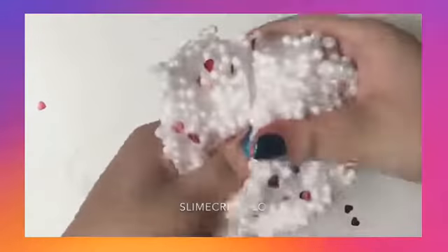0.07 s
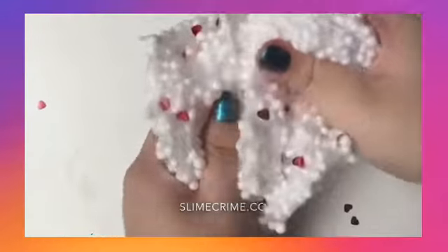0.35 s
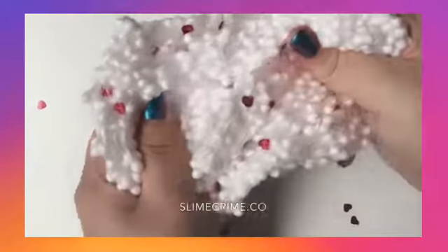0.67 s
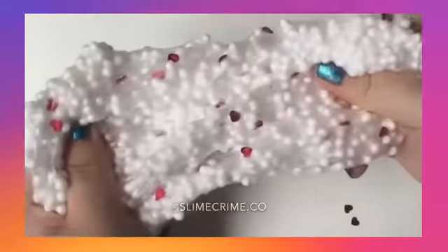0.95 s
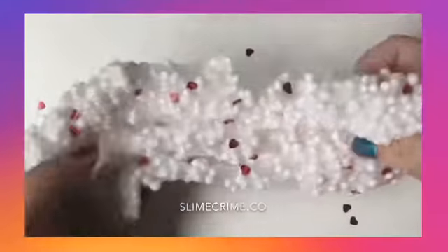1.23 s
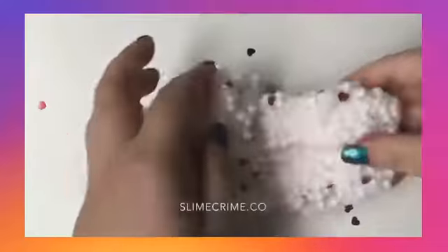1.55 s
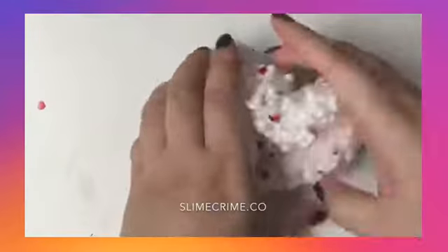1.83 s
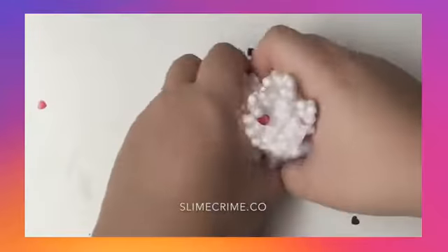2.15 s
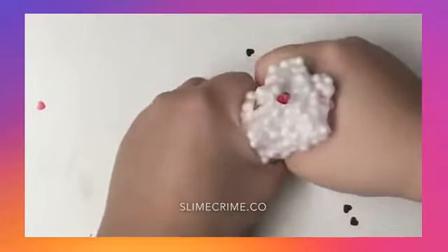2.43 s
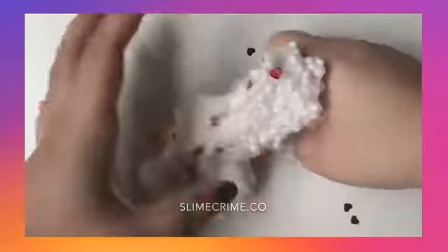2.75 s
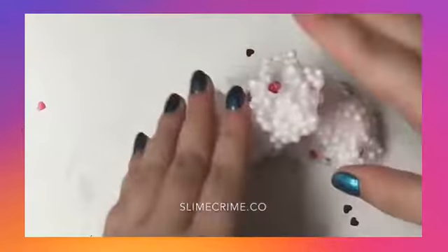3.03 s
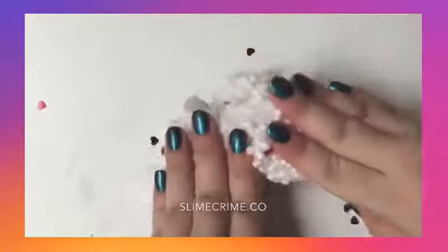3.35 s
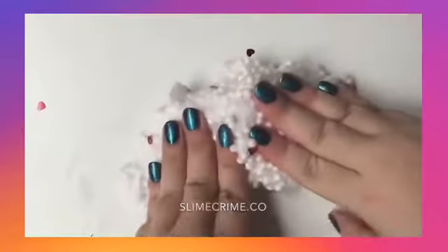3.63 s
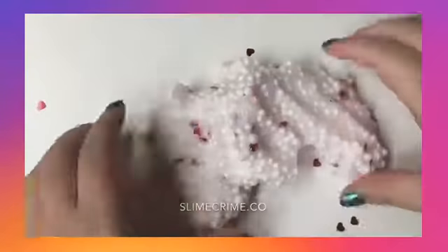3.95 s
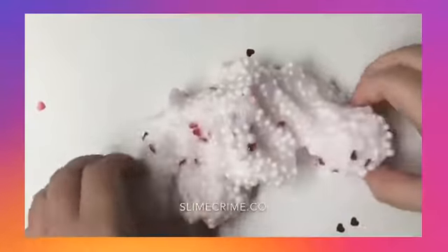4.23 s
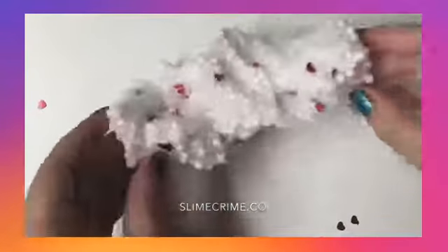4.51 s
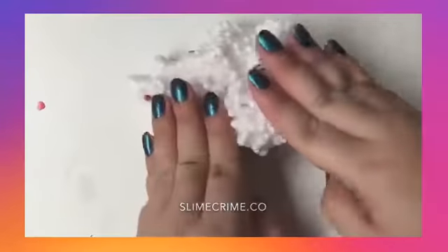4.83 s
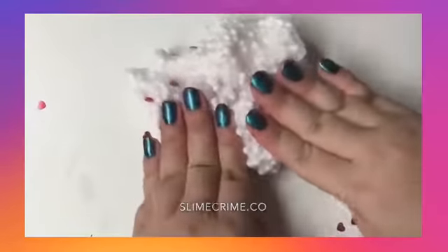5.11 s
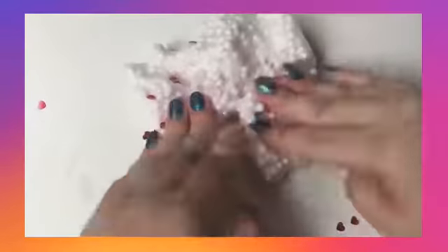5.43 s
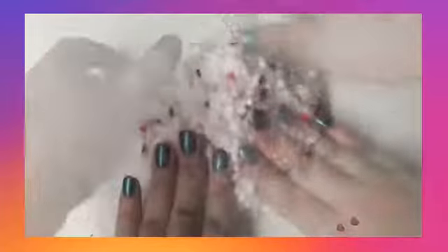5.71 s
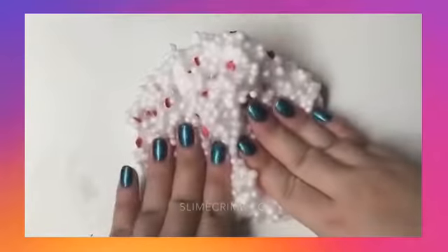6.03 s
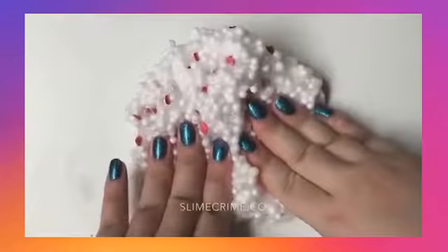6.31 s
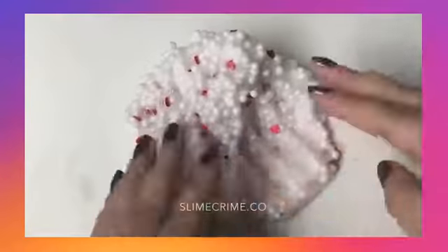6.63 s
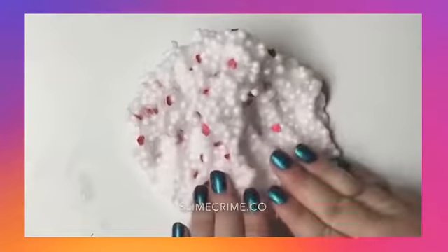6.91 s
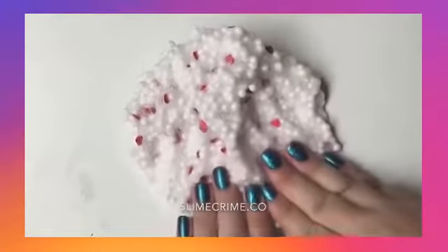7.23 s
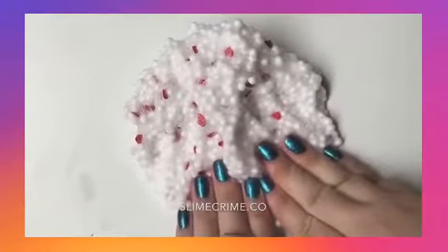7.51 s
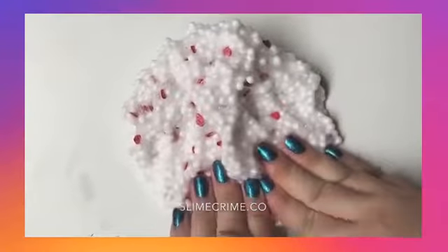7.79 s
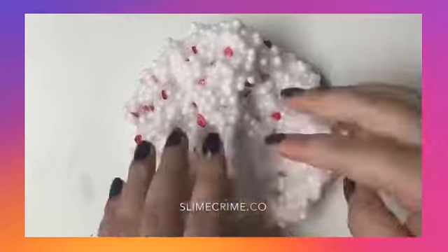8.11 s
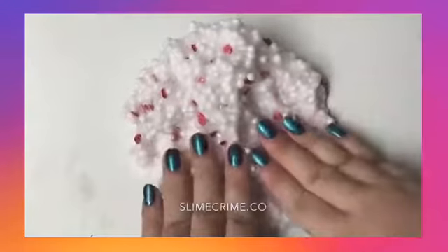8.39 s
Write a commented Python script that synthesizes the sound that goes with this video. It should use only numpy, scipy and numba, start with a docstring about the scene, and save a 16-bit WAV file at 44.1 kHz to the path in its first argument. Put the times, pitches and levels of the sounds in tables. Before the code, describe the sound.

Two hands stretch foam-bead slime, and it fizzes with a fine, wet crackle and sharp little snaps. A hard squeeze thickens the crackle into a loud, short rip. Then the slime is pressed and peeled again and again on a table, each stroke a crunchy burst with small bubble pops and an occasional soft thud. The sound is close, in a small, dry room with a faint rumble and hiss.

```python
"""A fine, wet crackle, close up: two hands knead, stretch and press foam-bead slime on a table.
Tiny air pockets burst between the beads, and the crackle thickens to a rip when the slime peels away.
Thin films snap, bigger bubbles pop singly, a few deep pockets thud and hollows ring briefly.
A small, dry room lies behind, with a low rumble and a faint hiss."""
import sys
import numpy as np
from scipy import signal
from scipy.fft import rfft, irfft, next_fast_len
from scipy.io import wavfile
from numba import njit

SR = 44100
rng = np.random.default_rng(int(sys.argv[2]) if len(sys.argv) > 2 else 0)


def unload_audio(sound):
    """Save the sound as a 16-bit wav file, at the path given as the first command line argument."""
    columns = np.transpose(np.atleast_2d(sound))
    # keep every value between -1 and 1, then stretch to whole-number steps
    steps = np.round(np.clip(columns, -1, 1) * 32767)
    wavfile.write(sys.argv[1], SR, steps.astype(np.int16))


N = 377039
TIME = np.arange(N) / SR


def kneading(crackle_db, squelch_db, rumble_db, fitful):
    """Pockets of every size give way: in fits and starts under gentle pressure, in one rip on a peel."""
    # EQ of each layer: freq_hz, gain_db
    crackle_eq = [(500, -10), (2000, 4.5), (3500, -5), (6000, -3.5), (9000, 2.5), (11000, 5.5),
                  (13500, 5.5)]
    squelch_eq = [(150, -3.5), (500, -9.5), (900, 4.5), (1500, 2), (2300, -2), (3500, 2), (6000, -9.5),
                  (13000, -15)]
    rumble_eq = [(25, -11), (70, 4.5), (150, -0.5), (270, 1), (450, 3.5), (1000, -11.5), (8000, -40.5)]
    fits_db = stick_slip(rate=55, fade_s=.0015, steady_share=.36, scatter_db=4.5)
    slip_db = 1.4 * walk(40) + .7 * walk(260) + fitful * fits_db
    crackle = swarm(crackle_db + slip_db, rate=6000, band_hz=(3510, 13800), q=3.7, scatter_db=4.5,
                    wander=1)
    squelch = swarm(squelch_db + slip_db, rate=2800, band_hz=(1256, 3810), q=2, scatter_db=.5,
                    wander=.41)
    # wide cavities suck open only where wet squelching and dragging come together
    suction_db = np.minimum(.42 * squelch_db + .58 * rumble_db, squelch_db + 1)
    laid_down_s = 4.7  # they gape in the lifted lump, less once it is pressed flat
    suction_db += np.where(TIME < laid_down_s, 2.5, -2.5)
    suction = swarm(suction_db + .7 * slip_db, rate=700, band_hz=(550, 1090), q=5.3, scatter_db=4,
                    wander=.78)
    rumble = swarm(rumble_db + .4 * slip_db, rate=900, band_hz=(64.3, 424), q=2.9, scatter_db=-1.5,
                   wander=.37)
    return (eq(crackle, crackle_eq) + eq(squelch, squelch_eq)
            + undb(-2.1) * suction + eq(rumble, rumble_eq))


def handwork():
    """The hands' strokes set the crackle, squelch and rumble envelopes in dB, and how fitful they are."""
    # rise and fall each span 10 dB; wetness and drag are relative to the stroke's crackle the slime is drawn
    # out and fizzes, save the row at 0.405 s, a brief ring after the loud snap: peak_s, rise_s, fall_s,
    # crackle_db, wetness_db
    stretches = [(0.03, 0.066, 0.25, -43, -12), (0.27, 0.14, 0.11, -49, -7), (0.405, .01, .05, -39, -13),
                 (0.74, .36, 0.29, -47, -10), (0.94, .02, 0.024, -39, -11), (1.03, .035, 0.14, -36, -10),
                 (1.18, 0.062, 0.067, -39, -11), (1.35, .07, .12, -39, -9), (1.6, 0.13, .2, -47, -10),
                 (4.2, .16, 0.085, -44, -9.5), (4.51, 0.054, 0.19, -53, -12)]
    # fingers press into the lump: peak_s, rise_s, fall_s, crackle_db, wetness_db
    presses = [(1.96, 0.11, 0.093, -42, 0), (2.09, 0.063, 0.11, -32, -10), (2.2, 0.0527, .1, -33, -10),
               (2.301, 0.028, 0.041, -32, -12), (2.385, .035, .048, -28, -13),
               (3.22, .05, 0.095, -52, -11.5), (3.35, .055, .17, -40, -6), (4.75, 0.053, 0.095, -54, -8),
               (4.92, 0.071, 0.098, -43, -6), (5.04, .07, 0.16, -44, -6), (5.44, .07, .16, -55, -6),
               (5.67, 0.099, 0.1204, -47.5, -4.5), (5.87, .13, .21, -44, -9), (5.945, .02, 0.023, -32, -13),
               (6.96, .075, 0.21, -35, -7), (7.26, 0.083, 0.22, -47, -7), (7.47, .025, 0.051, -45.5, -9),
               (8.3, .04, 0.09, -47, -9.5), (8.43, 0.094, 0.088, -40, -6)]
    # the slime rips off the skin: peak_s, rise_s, fall_s, crackle_db, wetness_db, drag_db
    peels = [(2.545, 0.029, .072, -22.5, -7.5, -16), (2.7, .08, .11, -37, -8.5, -11.5),
             (3.7, 0.0472, 0.042, -28, -11, -18), (4.3, .05, .042, -29, -15, -23),
             (5.322, .036, .033, -29, -11, -18), (6.335, .048, .043, -23.5, -12, -21),
             (7.79, .06, 0.089, -30, -11.5, -19), (7.95, .06, 0.053, -44, -12.5, -20)]
    # the lump is patted or settles on the table: peak_s, rise_s, fall_s, rumble_db
    pats = [(1.81, 0.04103, 0.072, -60), (2.8, 0.047, 0.055, -52), (2.93, 0.079, .18, -62),
            (3.515, 0.014, 0.052, -49), (3.8, .03, 0.0298, -61), (3.905, .015, .035, -44),
            (3.99, .06, .18, -58), (5.57, 0.038, 0.059, -58), (6.775, .02, 0.037, -57),
            (8.095, 0.035, 0.032, -61)]
    wetness, drag = 4, 5  # columns
    stretch, press, pat = (strokes(rows) for rows in (stretches, presses, pats))
    wet_stretch, wet_press = (strokes(rows, wetness) for rows in (stretches, presses))
    peel, wet_peel, peel_drag = (strokes(peels, column, shape=1.5, stop=1.25)
                                 for column in (None, wetness, drag))
    rest_crackle_db, rest_squelch_db, rest_rumble_db = -75, -77, -74  # slime left alone
    crackle = power_sum(stretch, press, peel, pat - 10, rest_crackle_db)
    squelch = power_sum(wet_stretch, wet_press, wet_peel, pat - 11, rest_squelch_db)
    dough = lambda db: .55 * (db + 40)  # the dough's rumble grows more slowly than its crackle
    rumble = power_sum(dough(stretch) - 60, dough(press) - 63, peel_drag, pat, rest_rumble_db)
    share = lambda db: undb(db - crackle) ** 2
    fitful = .65 * share(stretch) + 1.05 * share(press) + .62 * share(peel)  # 0 even, 1 fits and starts
    return crackle, squelch, rumble, fitful


def strokes(rows, offset_column=None, shape=1.45, stop=1):
    """Strokes swell and fade, in dB; shape 1 peaks sharply, 2 roundly, and stop over 1 cuts the tail."""
    t = TIME[::50]
    swells = []
    for row in rows:
        peak, rise, fall, db = row[:4]
        db += row[offset_column] if offset_column else 0
        away = np.abs(t - peak) / np.where(t < peak, rise, fall)
        swells.append(db - 10 * away ** np.where(t < peak, shape, shape * stop))
    return np.interp(TIME, t, power_sum(*swells))


def stick_slip(rate, fade_s, steady_share, scatter_db):
    """The level in dB jumps when a patch lets go, drops within milliseconds and idles between slips."""
    chance, strength = rng.random(N), rng.standard_normal(N)
    slips = (chance < rate / SR) * undb(2 * scatter_db * np.clip(strength, -2, 1.3))
    power = signal.lfilter([1], [1, -np.exp(-1 / (fade_s * SR))], slips)
    return 10 * np.log10(steady_share + (1 - steady_share) * power / np.mean(power))


def swarm(level_db, rate, band_hz, q, scatter_db, wander, crowding=.5, count=180000):
    """Pockets burst at random, rate a second at -45 dB; harder work bursts more as well as bigger ones."""
    density = np.minimum(rate * undb(crowding * (level_db + 45)), 20000)
    due = np.cumsum(density) / SR
    wait, pitch, sign = rng.random((count, 3)).T
    strength, ring = np.minimum(rng.standard_normal((count, 2)), 2).T
    turn = np.cumsum(-np.log(1 - wait))
    at = np.searchsorted(due, turn[turn < due[-1]])  # each pocket bursts when its turn falls due
    n = len(at)
    spread = undb(scatter_db * strength)
    size = spread[:n] / np.sqrt(np.mean(spread ** 2))
    size *= undb(level_db[at]) * np.sqrt(1000 / density[at])
    low_hz, high_hz = band_hz
    hz = low_hz * (high_hz / low_hz) ** pitch[:n]
    # neighbouring pockets are alike in size, so a favoured pitch wanders as the fingers move on
    size *= np.sqrt(1 + np.tanh(wander) * np.cos(2 * np.pi * np.log(hz) + np.pi * walk(18)[at]))
    return bursts(at / SR, hz, q * np.exp(.59 * ring[:n]), size * np.sign(sign[:n] - .5))


@njit
def bursts(times, hz, q, size):
    """Each burst kicks its own damped cavity; size is the rms it would have if spread over 1 ms."""
    out = np.zeros(N)
    for k in range(len(times)):
        w = 2 * np.pi * min(hz[k], .4 * SR) / SR
        loss = np.sin(w) / (2 * q[k])
        kick = size[k] * np.sqrt(SR / 1000 * loss / (1 + loss))
        pull, keep = 2 * np.cos(w) / (1 + loss), (1 - loss) / (1 + loss)
        start, last, before = int(times[k] * SR), 0., 0.
        for i in range(min(int(7 / min(loss, w / 3)) + 4, N - start)):
            y = pull * last - keep * before + (kick if i == 0 else -kick if i == 2 else 0.)
            before, last = last, y
            if start + i >= 0:
                out[start + i] += y
    return out


def snaps(small, small_crumble=.06, q=2.07, cluster_s=.0005, spurt_s=.0035, cluster_q=.86, count=24):
    """A film snaps: a sharp tick amid a spurt of smaller ticks; the more crumble, the longer the spurt."""
    # thin films snapping between beads: start_s, level_db (before EQ), pitch_hz, crumble_share
    films = [(0.0349, -15.5, 8600, 0.22), (0.2882, -26.5, 10000, 0.13), (0.302, -14.5, 8600, 0.06),
             (0.34, -25, 8600, 0.7), (0.3979, -6, 9340, 0.06), (0.9477, -22, 10630, 0.36),
             (1.0273, -16, 13150, 0), (1.04, -19.5, 12600, 0.6), (1.1492, -26, 11300, .4),
             (1.1562, -23.5, 9400, 0.2), (1.234, -25.5, 10100, 0.39), (1.2999, -25.5, 11500, 0.04),
             (1.3493, -15, 10500, 0), (1.4287, -23.5, 10070, 0.15), (1.6396, -31, 5487, 0.09),
             (2.0646, -22, 10800, 0.11), (2.0817, -15, 11950, 0.43), (2.106, -18, 12510, 0.08),
             (2.1262, -17.5, 10390, .9), (2.1963, -13.5, 11700, 0.4), (2.2031, -7.5, 11230, 0.05),
             (2.2283, -10, 12600, 0), (2.2517, -23.5, 11500, .1), (2.3078, -12, 10100, 0.05),
             (2.3108, -16, 7240, 0.87), (2.373, -8, 9900, .18), (2.4796, -22.5, 10040, 0.04),
             (2.5256, -14, 6950, 0.1), (2.5647, -10, 10930, 0.28), (2.9774, -36, 10910, 0),
             (3.1808, -19, 11100, 0.09), (3.2817, -27, 12080, 0.4), (3.3485, -23, 7897, .4),
             (3.493, -37, 8340, 0.18), (3.6431, -17.5, 11500, 0.08), (4.2685, -17, 9300, 0.03),
             (4.292, -10.5, 10180, 0.32), (4.7247, -16.5, 10180, 0), (4.8686, -27.5, 8520, 0.19),
             (4.9, -24.5, 8760, 0.43), (5.0029, -30, 10610, 0.43), (5.0809, -20.5, 5800, .1),
             (5.1409, -25.5, 9087, 0.01), (5.3256, -15, 11380, 0.08), (5.423, -28.5, 8100, 0.48),
             (5.7254, -23, 10520, 0), (5.804, -25.5, 9520, 0), (5.838, -26.5, 11240, 0.01),
             (5.9005, -26, 10200, 0.05), (5.9122, -22, 11630, 0), (5.9436, -11, 10800, 0.4),
             (5.9882, -26.5, 11330, 0.35), (6.1746, -34.5, 9295, .15), (6.2444, -26, 11820, 0),
             (6.2953, -16, 9900, 0), (6.8829, -18.5, 8692, .06), (6.897, -15, 10300, 0.1),
             (6.919, -18.5, 7670, .4), (6.9753, -14.5, 8500, 0.27), (6.9833, -8, 8380, 0.2),
             (7.0248, -13, 10110, 0), (7.0504, -11.5, 10410, 0.32), (7.056, -15, 11230, 0.17),
             (7.1091, -19, 11600, 0.1), (7.141, -20.5, 9694, 0), (7.19, -24, 12030, 0.03),
             (7.2062, -25.5, 12470, 0.01), (7.257, -22.5, 10340, 0.4), (7.304, -25.5, 11300, 0.28),
             (7.399, -26.5, 10530, 0.47), (7.4768, -28, 7250, 0.01), (7.7283, -24, 9920, 0.16),
             (7.7764, -18, 12210, .02), (8.241, -20, 9614, 0.1), (8.2606, -23.5, 11570, 0.03),
             (8.2829, -24, 10140, 0.43), (8.4067, -27.5, 7100, .09), (8.4332, -16, 11000, 0.49),
             (8.4957, -17, 11530, 0.15)]
    # snap EQ: freq_hz, gain_db
    snap_eq = [(100, 0), (1000, -3.5), (3000, 2.5), (6000, -0.5), (10000, 0.5), (13500, 2)]
    small_films = np.column_stack([small, np.full(len(small), small_crumble)])
    start, db, hz, crumble = np.vstack([films, small_films]).T
    ticks = bursts(start, hz, np.full(len(start), q), undb(db) * np.sqrt(1 - crumble))
    jitter, detune, size = rng.standard_normal((len(start), 3, count)).transpose(1, 2, 0)
    size = size / np.sqrt(np.sum(size ** 2, axis=0)) * undb(db + 2) * np.sqrt(crumble)
    times = start + (cluster_s + spurt_s * crumble) * (jitter + .18)
    pitches = hz * np.exp(.31 * detune)
    cluster = bursts(times.ravel(), pitches.ravel(), np.full(size.size, cluster_q), size.ravel())
    return eq(ticks + cluster, snap_eq)


def pops(small, decay_cycles=.3, hollow_q=5., hollow_db=-10):
    """A bubble swells open in about one cycle, and the wider hollow it leaves rings a moment longer."""
    # air bubbles popping: start_s, level_db (before EQ), pitch_hz
    bubbles = [(0.1776, -29.5, 2957), (0.2621, -29.5, 2070), (0.3979, -25, 3670), (1.0273, -29, 2091),
               (1.863, -31.5, 1030), (1.87, -30.5, 1382), (1.9575, -18, 1754), (2.0816, -27, 2765),
               (2.1624, -28, 1039), (2.226, -23, 2530), (2.3893, -24.5, 1752), (2.5254, -26.5, 2097),
               (3.4061, -17, 1423), (4.1477, -35.5, 2795), (4.917, -31, 1503), (4.9383, -30.5, 1937),
               (5.0812, -23.5, 1820), (5.1333, -34.5, 3450), (5.1736, -32.5, 2842), (5.6338, -31.5, 2746),
               (5.7288, -28, 2376), (5.838, -32.5, 2385), (5.9007, -30, 2623), (5.944, -26.5, 2615),
               (6.0527, -34.5, 1376), (6.7622, -38, 2340), (6.854, -33.5, 1852), (6.8839, -24, 2333),
               (6.919, -24, 1955), (6.9527, -23.5, 2638), (6.983, -19.5, 1900), (7.0551, -24, 2219),
               (7.0968, -17, 2089), (7.2061, -30, 2467), (7.2577, -37.5, 2622), (8.4073, -22, 1587),
               (8.4487, -31, 2170), (8.468, -30.5, 1790), (8.4956, -32.5, 3224)]
    # pop EQ: freq_hz, gain_db
    pop_eq = [(100, -22.5), (400, -5.5), (1200, 0.5), (2500, -0.5), (4500, 6.5), (7000, 16.5), (13000, -20)]
    start, db, hz = np.vstack([bubbles, small]).T
    t = TIME[:SR // 100]
    cycles = hz[:, None] * t
    waves = cycles * np.exp(-cycles / decay_cycles) * np.sin(2 * np.pi * cycles)
    waves /= np.sqrt(np.sum(waves ** 2, axis=1, keepdims=True) * 1000 / SR)
    at = (start[:, None] * SR).astype(int) + np.arange(len(t))
    opening = np.bincount(at.ravel(), (waves * undb(db)[:, None]).ravel(), N)[:N]
    hollow_hz = .833 * hz * np.exp(.26 * rng.standard_normal(len(start)))
    hollow = bursts(start, hollow_hz, np.full(len(start), hollow_q), undb(db + hollow_db))
    return eq(opening + hollow, pop_eq)


def strays(level_db, fitful, rate, typical_db, growth, scatter_db, hz, spread, count=600):
    """Chance bursts, rate a second when fitful is 1, as rows of start_s, level_db, pitch_hz."""
    when, chance = rng.random((count, 2)).T
    size, pitch = np.clip(rng.standard_normal((count, 2)), -1.5, 1.5).T
    at = (when * (N - 1)).astype(int)
    effort_db = level_db[at] + 45
    # gentle work shrinks them in step; hard work enlarges them only a little
    db = typical_db + np.minimum(effort_db, growth * effort_db) + scatter_db * size
    rows = np.column_stack([at / SR, db, hz * np.exp(spread * pitch)])
    return rows[chance < rate * fitful[at] ** 2 * N / SR / count]


def thuds(q=.93):
    """Deep air pockets collapse under the fingers, each with one soft, low push."""
    # collapsing pockets: start_s, level_db (before EQ), pitch_hz
    pockets = [(0.397, -27, 636), (2.122, -31.5, 494), (2.163, -23.5, 640.2), (3.4064, -28.5, 804),
               (3.5163, -21.5, 418.7), (3.907, -36.5, 382), (3.919, -34, 245), (6.981, -23.5, 300.6)]
    # bass-heavy EQ: freq_hz, gain_db
    thud_eq = [(30, 8), (100, 10), (400, 0), (1400, 5), (2200, -7), (8000, -26)]
    start, db, hz = np.transpose(pockets)
    return eq(bursts(start, hz, np.full(len(start), q), undb(db)), thud_eq)


def hollows(q=9., glide=.22, rough=.08, count=50):
    """Tiny bursts ring each hollow; its walls tremble and its pitch rises as it narrows."""
    # hollows opening in the slime: start_s, length_s, level_db, pitch_hz
    openings = [(0.396, 0.025, -47, 5030), (1.036, .055, -48.5, 781.4), (2.524, 0.056, -39.5, 1073),
                (2.549, 0.022, -31.5, 5200), (3.669, 0.053, -46.5, 991.4), (4.27, 0.068, -49, 781),
                (5.29, .04, -42, 4008), (6.309, 0.062, -40.5, 1171), (7.779, 0.063, -47.5, 2995)]
    out = np.zeros(N)
    for start, length, db, hz in openings:
        along, sign, tremble = rng.random((count, 3)).T
        size = undb(db) * np.sqrt(length * 1000 / count) * np.sign(sign - .5)
        pitch = hz * np.exp(glide * (along - .5) + rough * (2 * tremble - 1))
        out += bursts(start + length * along, pitch, np.full(count, q), size)
    return out


def scattered(x, t60, gap_s, count=6):
    """Echoes travel along paths that keep changing as the hands move."""
    paths = np.array([walk(14) for _ in range(count)])
    paths /= np.sqrt(np.sum(paths ** 2, axis=0))
    return sum(path * diffuse(x, t60, gap_s) for path in paths)


def diffuse(x, t60, gap_s):
    """A diffuse tail starts after a gap and dies away, 60 dB in t60 seconds."""
    t = TIME[:SR // 4]
    onset = np.clip(t / gap_s - 1, 0, 1)
    tail = rng.standard_normal(len(t)) * np.exp(-np.log(1000) * t / t60) * onset
    return signal.oaconvolve(x, tail / np.sqrt(np.sum(tail ** 2)))[:N]


def treble_spread(x):
    """The treble's stereo width swells and shrinks along a drawn curve."""
    # width automation: time_s, side_db
    width = [(0, -57), (1.5, -35), (1.75, -11), (2.15, -8), (2.8, -28), (3.3, -12), (3.7, -44), (4.6, -50),
             (4.85, -14.5), (5.7, -30.5), (6.3, -18), (7.05, -13), (7.45, -25), (7.7, -54)]
    # side EQ: freq_hz, gain_db
    side_eq = [(100, -30.5), (2400, -62), (4000, -1), (8000, 2), (14000, -9)]
    side_gain = undb(np.interp(TIME, *np.transpose(width)))
    return side_gain * eq(diffuse(x, t60=.07, gap_s=.0043), side_eq)


def room_tone(level_db=-60):
    """The room's low rumble lies under a faint, even hiss."""
    # room tone spectrum: freq_hz, gain_db
    tone_eq = [(15, -22), (25, 7), (48, -2), (65, -5), (113, -8), (150, -11), (190, -14), (275, -18),
               (380, -25), (1050, -23), (2250, -28.5), (14000, -32)]
    noise = eq(rng.standard_normal(N), tone_eq)
    return noise / np.std(noise) * undb(level_db)


def eq(x, points):
    """Minimum-phase EQ through points of freq_hz, gain_db."""
    hz, db = np.transpose(points)
    size = next_fast_len(N + SR // 2) * 2
    freq = np.maximum(np.arange(size // 2 + 1) * SR / size, 1)
    cepstrum = irfft(np.log(undb(np.interp(np.log(freq), np.log(hz), db))))
    cepstrum[1:size // 2] *= 2  # folded forward, so nothing rings ahead of a tick
    cepstrum[size // 2 + 1:] = 0
    return irfft(rfft(x, size) * np.exp(rfft(cepstrum)))[:N]


def walk(rate):
    """Random drift with a spread near 1, turning rate times a second."""
    steps = rng.standard_normal(N // 20)
    return 1.2 * np.interp(TIME * rate, np.arange(len(steps)), steps)


def power_sum(*levels_db):
    """The level in dB of sounds that add in power."""
    return 10 * np.log10(sum(10 ** (db / 10) for db in levels_db) + 1e-18)


def undb(db):
    """Decibels to gain."""
    return 10 ** (np.asarray(db) / 20)


def scene():
    """The slime sits dead centre; the hands scatter its sound at once, the walls a little later."""
    # tone of the wall echoes: freq_hz, gain_db
    wall_eq = [(100, -4), (1000, -3.5), (4000, -6), (8000, -2.5), (14000, -26.5)]
    crackle_db, squelch_db, rumble_db, fitful = handwork()
    small_snaps = strays(crackle_db, fitful, rate=20, typical_db=-31, growth=.31, scatter_db=4,
                         hz=9740, spread=.13)
    small_pops = strays(squelch_db, fitful, rate=25, typical_db=-32, growth=.4, scatter_db=3,
                        hz=2071, spread=.23)
    slime = kneading(crackle_db, squelch_db, rumble_db, fitful)
    slime += snaps(small_snaps) + pops(small_pops) + thuds() + hollows()
    hands = undb(-11.5) * scattered(slime, t60=.013, gap_s=.00018)
    walls = undb(-17) * eq(scattered(slime, t60=.051, gap_s=.0016, count=4), wall_eq)
    side = treble_spread(slime) * np.array([[1], [-1]])
    return slime + hands + walls + side + room_tone()


def record(dry):
    """Soft saturation rounds the tallest ticks, and a steep low-pass cuts the top."""
    ceiling, top_hz = .72, 14000
    lowpass = signal.ellip(8, .3, 70, top_hz, fs=SR, output="sos")
    return signal.sosfilt(lowpass, ceiling * np.tanh(dry / ceiling))


dry = scene()
out = record(dry)
unload_audio(out)
```